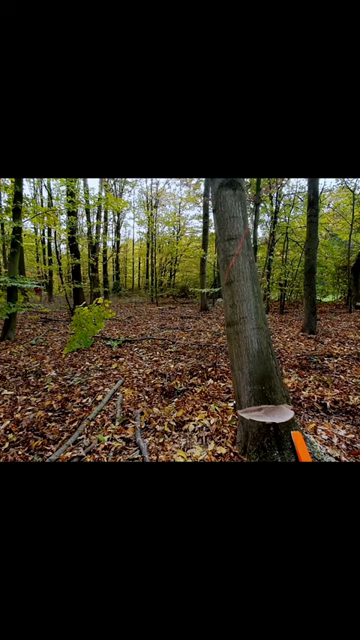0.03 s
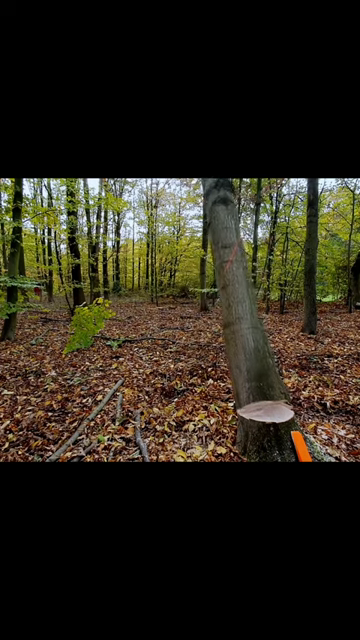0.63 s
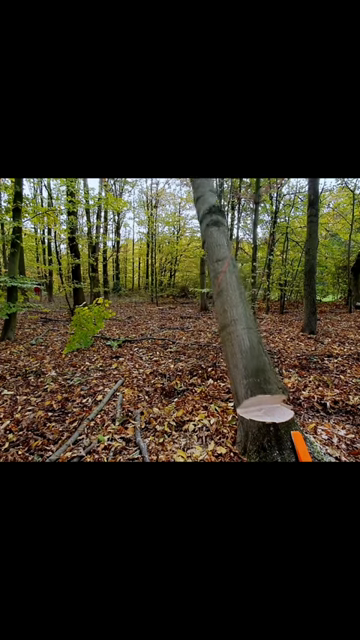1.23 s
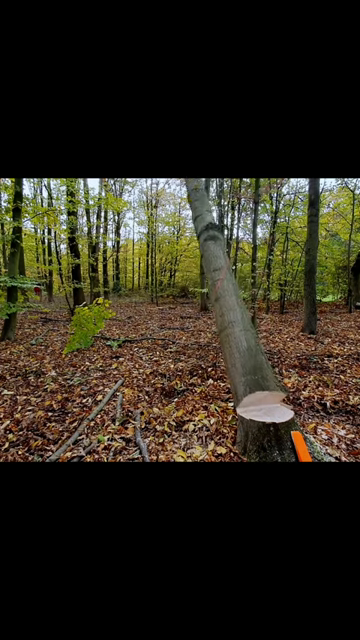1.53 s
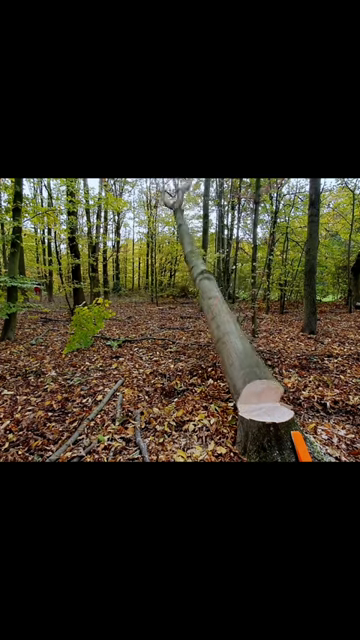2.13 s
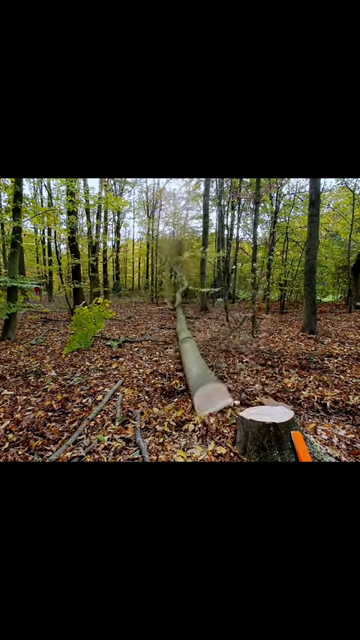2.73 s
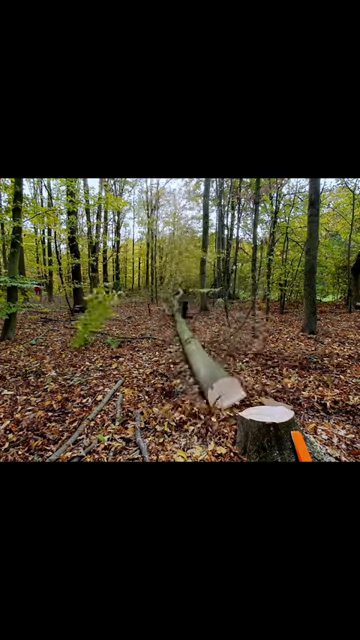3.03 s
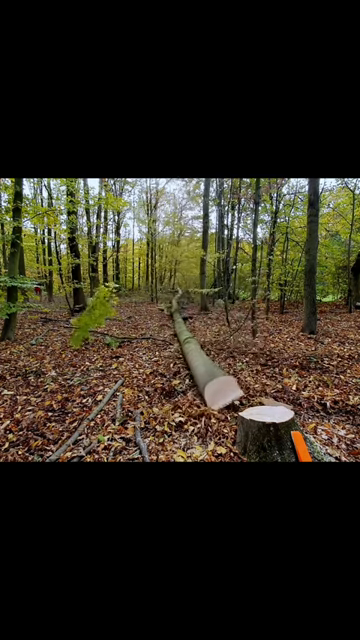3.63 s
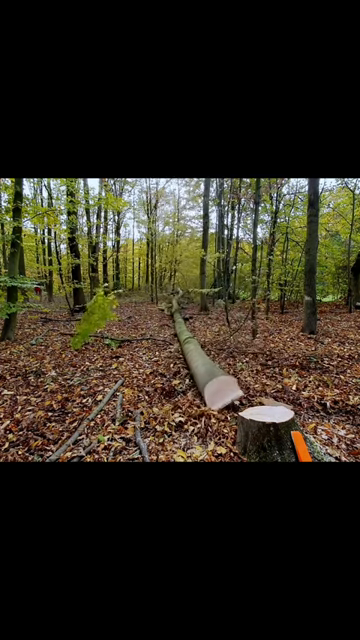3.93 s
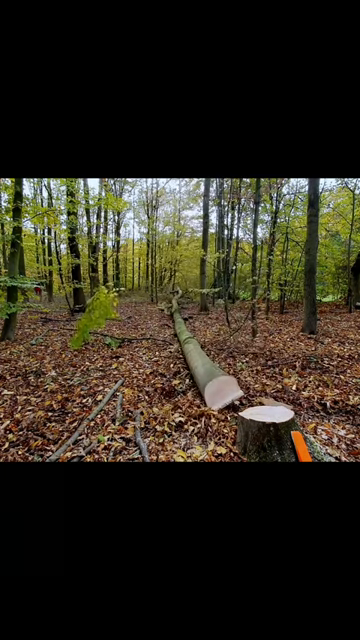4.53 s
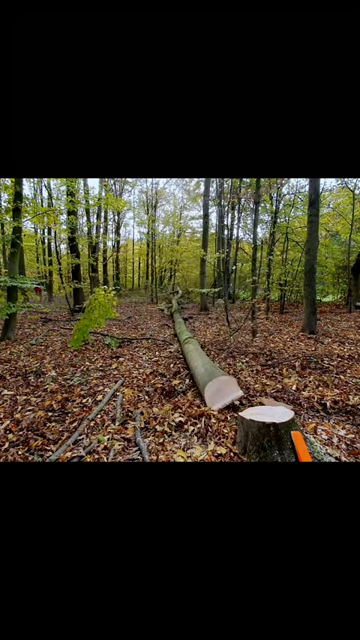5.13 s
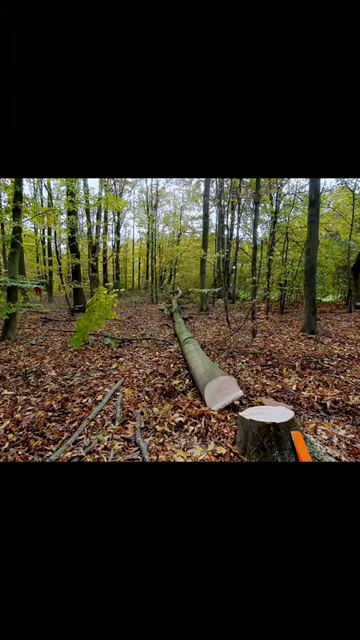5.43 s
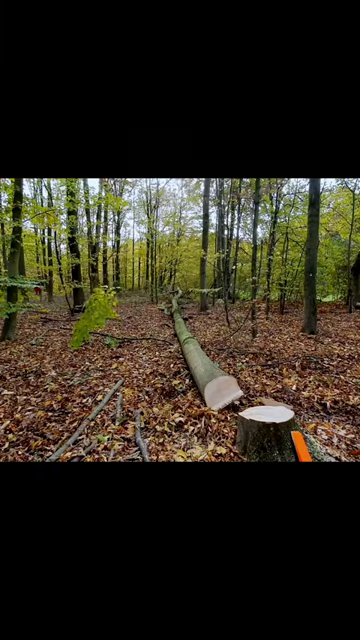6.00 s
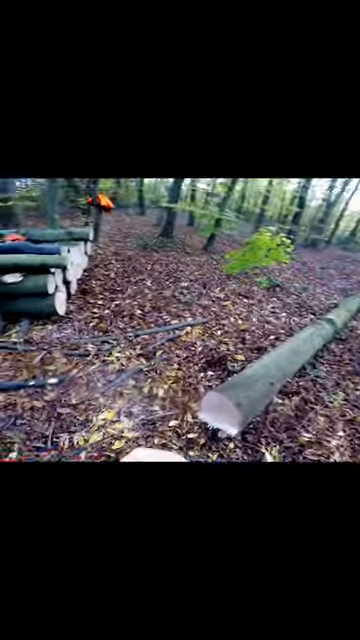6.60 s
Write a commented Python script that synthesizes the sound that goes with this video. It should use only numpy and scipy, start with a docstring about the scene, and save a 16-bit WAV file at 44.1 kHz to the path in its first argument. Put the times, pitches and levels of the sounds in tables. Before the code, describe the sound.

A sawn tree starts to tip close by in a forest, slightly to the right. From the start, wood fibres snap in sharp, dry clicks, growing denser from about 0.4 seconds as the trunk groans and creaks. A hard splitting crack comes near 1.3 seconds, and tearing continues until about 2.3. The leafy crown swishes down, swelling around 2.5 seconds. Between 2.6 and 3.3 seconds the tree crashes onto the soil with deep thuds, woody knocks, breaking branches and crushed leaves, loudest near 3 seconds. Smaller bumps and rustles die away by about 4 seconds. Twigs and bark patter lightly, with a small tick and crackle around 4.5. Dry leaves keep stirring faintly over a low distant rumble. At 6.5 seconds the sound drops out briefly, then returns as a short, dull buffeting of air on the moving microphone.

```python
"""In a forest, a sawn tree tips over close by: its hinge fibres snap and tear while the trunk groans.
The crown sweeps down, branches break and the trunk thuds on the soil; twigs and dry leaves settle.
Near the end the sound drops out briefly and returns as the dull buffeting of a moving microphone."""
import sys
import numpy as np
from scipy import signal
from scipy.fft import rfft, irfft, next_fast_len
from scipy.io import wavfile
from scipy.ndimage import map_coordinates

SR = 44100
rng = np.random.default_rng(int(sys.argv[2]) if len(sys.argv) > 2 else 0)


def output_pcm(signal):
    """Save a mono or channel-first signal as 16-bit PCM at the path in sys.argv[1].

    Samples are clipped to [-1, 1] before scaling.
    """
    pcm = np.clip(np.atleast_2d(signal).T, -1, 1) * 32767
    wavfile.write(sys.argv[1], SR, np.round(pcm).astype(np.int16))


N = 298116

# Levels are faders within a layer, ahead of its trim and the final mix.
# Featured fibre and twig snaps. Each row: time in seconds, body in dB, pitch in Hz, sizzle in dB.
SNAPS = [(0.0292, -16, 4100, -22), (0.0709, -19, 4100, -29), (0.116, -18.5, 4500, -25.5),
         (0.1214, -19.5, 3900, -29.5), (0.1606, -27.5, 4640, -22.5), (0.1724, -20, 4310, -20),
         (0.2665, -27.5, 5010, -30), (0.2753, -15.5, 4660, -23.5), (0.4251, -13.5, 3570, -16),
         (0.464, -18.5, 4410, -24.5), (0.49, -12.5, 3500, -15), (0.5288, -12.5, 3030, -18.5),
         (0.5575, -20, 5000, -25), (0.615, -26, 6010, -25.5), (0.8687, -21.5, 4060, -17),
         (0.886, -11, 4100, -22), (0.8951, -12, 3350, -14.5), (0.9339, -17, 4800, -12.5),
         (0.9498, -5.5, 2220, -21.5), (0.9874, -19.5, 3180, -17), (1.0626, -14, 4200, -22.5),
         (1.1381, -11, 3040, -14.5), (1.1513, -9.5, 2520, -16), (1.1854, -17, 3260, -17.5),
         (1.2239, -10, 3304, -18.5), (1.2993, -13.5, 2770, -9.5), (1.3879, -10.5, 3040, -17),
         (1.4083, -11.5, 2960, -23), (1.4615, -9.5, 3870, -12.5), (1.4225, -18, 4800, -26),
         (1.4779, -16.5, 3280, -25), (1.5692, -9.5, 3180, -18.5), (1.609, -9.5, 3400, -13),
         (1.6649, -9, 2630, -17.5), (1.7118, -17.5, 2920, -23), (1.8224, -12, 2270, -18),
         (1.8749, -18, 3090, -18.5), (1.9046, -14.5, 2920, -14), (1.9796, -14, 2910, -13.5),
         (2.0165, -17, 4300, -20), (2.0574, -6, 2820, -17), (2.1064, -11, 4000, -17.5),
         (2.1257, -12, 2660, -14), (2.1623, -13.5, 3870, -20.5), (2.1764, -11.5, 3100, -15.5),
         (2.1855, -12.5, 4020, -19), (2.204, -13.5, 3430, -16), (2.3019, -16, 3220, -27),
         (2.858, -8.5, 4800, -15), (4.331, -29.5, 7000, -34), (4.494, -22.5, 3700, -28),
         (5.7296, -28, 3950, -40.5)]
# Bundles of fibres, twigs or dry leaves giving way.
# Each row: start in seconds, level in dB, 60 dB decay in seconds, centre in Hz.
TEARS = [(0.03, -28, 0.112, 4540), (.047, -28.5, 0.177, 7500), (.171, -23, 0.109, 9500),
         (.293, -25, 0.226, 6400), (.37, -32.5, 0.14, 880), (.396, -25.5, 0.127, 1980),
         (.531, -22, 0.037, 7000), (1.025, -25, 0.072, 1500), (1.049, -22.5, 0.064, 2280),
         (1.239, -25, 0.15, 2000), (1.256, -25, 0.245, 4693), (1.846, -21.5, 0.0455, 7000),
         (2.254, -21.5, 0.088, 1400), (2.268, -19.5, 0.108, 2010), (2.293, -21.5, 0.046, 5000),
         (2.708, -23.5, 0.1, 1500), (2.864, -15.5, 0.095, 5800), (2.932, -22, 0.308, 700),
         (2.998, -20, 0.16, 1300), (3.035, -23, 0.152, 750), (3.134, -22, 0.205, 1690),
         (4.563, -27, 0.12, 3300), (4.573, -26, 0.23, 7600), (4.682, -35.5, 0.049, 3200),
         (5.632, -42, 0.17, 9000), (5.656, -38.5, 0.086, 7000), (5.926, -40, 0.051, 15000),
         (5.945, -44.5, 0.21, 2700), (6.404, -32.5, 0.052, 7430)]
# The ring of the broken hinge. Each row: pitch in Hz, level in dB, 60 dB decay in seconds.
HINGE_MODES = [(1773, -5.5, .07), (2905, -0.5, .09), (3100, -2.5, .04), (3240, -1.5, 0.072),
               (4005, -2.5, 0.11), (4742, -2.5, 0.078)]
# The load on the hinge, heard as a steady groan. Each row: time in seconds, level in dB.
STRAIN = [(0, -42.5), (.32, -43), (.42, -36.5), (.66, -33), (1.36, -32.5), (1.65, -39.5), (1.9, -42),
          (2.02, -35.5), (2.27, -33.5)]
# The hinge slipping under load.
# Each row: start in seconds, length in seconds, groan in dB, creak in dB, creak centre in Hz.
SLIPS = [(0.386, 0.0407, -29.5, -33.5, 400), (0.979, 0.023, -37.5, -34.5, 350),
         (1.014, 0.0388, -29, -31, 400), (1.109, 0.0157, -38, -31.5, 1160), (1.12, 0.0284, -31.5, -30, 560),
         (1.168, .024, -30.5, -25, 660), (1.189, 0.0233, -28.5, -26, 380.4), (1.247, .04, -25, -19.5, 291),
         (1.335, 0.032, -37.5, -34.5, 280), (1.51, 0.0343, -42.5, -37, 482)]
# The trunk's resonances. Each row: pitch in Hz, bandwidth in Hz, level in dB.
TRUNK_MODES = [(168, 36, -5), (287.3, 17.55, 3.5), (336, 45, -4), (401.8, 25, -6), (488.2, 30, -3.5),
               (622, 30, -1.5), (1302, 52, -9)]
# Limbs and trunk striking the ground. Each row: time in seconds, rumble in dB, trunk ring in dB.
BLOWS = [(2.7, -24.5, -30), (2.809, -29, -34), (2.888, -21, -13), (2.907, -23.5, -11.5),
         (2.932, -26.5, -16.5), (2.97, -23, -27.5), (3.035, -18, -18.5), (3.152, -22.5, -23),
         (3.188, -28, -21.5), (3.222, -31.5, -21), (3.58, -42.5, -38), (3.8, -45.5, -49), (4.16, -52, -49),
         (4.567, -47.5, -40.5), (4.635, -42.5, -37)]
# Branches breaking. Each row: start in seconds, level in dB, pitch in Hz, 60 dB decay in seconds.
BRANCHES = [(2.6863, -17, 1770, .004), (2.7151, -7.5, 2564, .003), (2.9059, -14.5, 1300, .004),
            (2.9452, -2, 1048, .008), (2.974, -13, 915, .012), (2.989, -11.5, 983, .012),
            (3.0055, -5, 1382, .012), (3.0102, -9, 1490, .005), (3.0295, -10, 1450, .012),
            (3.062, -11, 3295, .025), (3.0796, -5, 1611, .004), (3.109, -14.5, 1890, .012),
            (3.127, -12, 1880, .006), (3.1485, -6, 1685, .005), (3.176, -15, 2408, .015),
            (3.2315, -16.5, 3300, .006), (3.462, -21, 2546, .015), (3.869, -27.5, 2200, .015),
            (4.018, -32.5, 2140, .025), (5.745, -36, 1800, .004), (6.174, -34, 1290, .005)]
# The trunk hitting the soil. Each row: start in seconds, level in dB, pitch in Hz.
THUDS = [(2.614, -18.5, 66.3), (2.65, -26, 72.1), (2.869, -10, 64), (2.912, -11.5, 76), (3.031, -20.5, 64),
         (3.164, -28, 76), (3.699, -25, 68)]
# Dry leaves stirring nearby. Each row: time when full in seconds, level in dB, hold in seconds.
STIRS = [(4.344, -49, 0.04), (4.682, -48.5, 0.706), (5.478, -45, 0.134), (5.64, -42, 0.0157),
         (5.742, -47, 0.049), (5.924, -47, 0.042), (6.232, -44, 0.049), (6.37, -45.5, 0.079)]
# A faint far drone. Each row: pitch in Hz, level in dB.
HUM = [(59, -52.5), (396, -73.5)]
# Fader rides for far rumble, wind and the whole forest. Each row: time in seconds, level in dB.
RUMBLE_RIDE = [(0, -51.5), (.8, -41.5), (1.35, -42.5), (1.75, -56.5), (2.5, -48), (3.3, -48.5),
               (3.8, -49.5), (4.2, -55), (4.6, -49), (5.05, -45.5), (6.48, -45.5)]
BUFFET_RIDE = [(6.58, -67.5), (6.61, -42.5), (6.655, -31), (6.69, -35), (6.76, -30)]
FOREST_RIDE = [(6.482, 2), (6.501, -46.5), (6.55, -88)]
# Tone curves of the noise layers. Each row: frequency in Hz, relative level in dB.
GROAN_EQ = [(59, -30.5), (100, -2.5), (134, -6), (183, 0), (262, -7.5), (327, -4), (496, -9), (557, -14.5),
            (611, -6.5), (694, -12.5), (1600, -17.5), (2080, -42.5), (3520, -120)]
SWISH_EQ = [(290, -7), (500, 0.5), (668, 0.5), (906, 0), (1340, -1.5), (1460, 0.5), (1600, -1), (1790, 1),
            (3980, -0.5), (15100, -11.5), (16000, -12)]
CRUSH_EQ = [(350, -30), (600, -9), (1030, -8.5), (1410, -5.5), (2340, -5), (3390, -3), (7730, -10.5),
            (9890, -9.5), (10900, -15), (15100, -17), (16000, -20)]
LIMBS_EQ = [(29, -32.5), (50, -4.5), (100, -1.5), (155, -2), (205, 4), (270, -2.5), (320, 2), (362, -4),
            (393, 3.5), (434, -4.5), (537, -3.5), (622, -10.5), (1410, -11), (2500, -15), (3250, -57),
            (5500, -120)]
LITTER_EQ = [(350, -7.5), (600, -1.5), (698, -1), (823, -4), (1160, -5.5), (1570, -5), (3300, -1.5),
             (7940, -6), (9360, -2.5), (13000, -9.5), (15100, -9), (16000, -10)]
RUMBLE_EQ = [(18, -36.5), (30, -8), (47, -4.5), (64, 2.5), (107, -6.5), (162, -22), (194, -16),
             (267, -22.5), (393, -21.5), (440, -24), (690, -27), (824, -27.5), (1400, -31.5), (1820, -55),
             (3080, -120)]
WIND_EQ = [(15, -32), (25, 0), (115, -9), (274, -22.5), (319, -14.5), (362, -25.5), (559, -23.5),
           (685, -31.5), (1800, -37), (3240, -44), (4070, -34), (11000, -65), (14300, -111), (22000, -120)]
# Stereo width. Each row: frequency in Hz, left-right likeness from 0 (wide) to 1 (mono).
LIKENESS = [(60, 0.984), (150, 0.957), (380, 0.915), (950, 0.583), (2380, 0.29), (5980, 0.092),
            (15000, 0.01)]
# Stereo balance. Each row: frequency in Hz, left minus right in dB.
BALANCE = [(80, 0.5), (200, -1), (700, -3.5), (2400, -3.5), (4400, -6.5), (8000, -6), (14000, -4)]
# The forest's reverb. Each row: frequency in Hz, 60 dB decay in seconds.
FOREST_DECAY = [(150, 0.59), (1500, 0.31), (5000, 0.28), (14000, 0.064)]
# Swells of the fall.
# Each gives: time when full in seconds, level in dB, rise in dB/s, hold in seconds, fall in dB/s.
SWEEP = (2.5, -31, 27, 0.2, 39)  # the crown rushing through the air
SHAKING = (2.5, -36, 98.5, 0.8948, 23.5)  # limbs thrashing
CRUSHING = (3, -29, 7, 0.2434, 50)  # leaves pressed into the ground
SETTLING = (3.5, -44, 24.5, 0.38, 23.5)  # leaves springing back
RESTING = (4, -55, 39.5, 3, 40)  # the leaf litter, never quite still

HINGE_OPENS_S, HINGE_PARTS_S = 0.37, 2.5
TIME = np.arange(N) / SR


def snaps(second_db=-8, wood_db=-20, sizzle_hz=10700, sizzle_t60=0.0036):
    """A fibre parts in two steps and knocks the wood; splinters sizzle, the litter scatters the click."""
    t = np.arange(SR // 50) / SR - .001
    direct, scatter = np.zeros(N), np.zeros((2, N))
    fibres = SNAPS + weak_snaps()
    chance = rng.uniform(-1, 1, (len(fibres), 2))
    for (s, db, hz, sizzle_db), (gap, size) in zip(fibres, chance):
        gap_s = 0.0005464 * 1.44 ** gap
        body = fracture(t, hz) + amp(second_db + 3.3 * size) * fracture(t - gap_s, hz)
        body += amp(wood_db) * fracture(t, hz * 0.518)
        hiss = rng.standard_normal(len(t)) * (t > 0) * amp(-60 * np.abs(t) / sizzle_t60)
        sizzle = band(hiss, sizzle_hz, octaves=.5)
        add(direct, s + t[0], amp(db - 3.5) * blip(body) + amp(sizzle_db - 3) * blip(sizzle))
        add(scatter, s, amp(db - 20) * crackle(t60=0.064, hz=4100, octaves=1.1))
    return from_right(direct, lag_ms=0.121) * amp([[-2], [0]]) + scatter


def weak_snaps(count=10, body_db=-23.5, hz=4300, sizzle_db=-30):
    """Extra SNAPS rows: lesser fibres go at random, ever more often as the hinge opens."""
    progress = np.sqrt((np.arange(count) + rng.random(count)) / count)
    times = HINGE_OPENS_S + progress * (HINGE_PARTS_S - HINGE_OPENS_S)
    return [(s, body_db + 2 * size, hz * 2 ** (.25 * pitch), sizzle_db + 2 * bright)
            for s, (size, pitch, bright) in zip(times, rng.standard_normal((count, 3)))]


def fracture(t, hz, cycles=0.506):
    """The click of parting wood: a push, a pull and a push of air, centred on t = 0."""
    return -np.cos(2 * np.pi * hz * t) * np.exp(-(hz * t / cycles) ** 2)


def tears():
    """Many small fibres go at once; the finer they are, the higher and wider the burst."""
    bursts = np.zeros((2, N))
    for s, db, t60, hz in TEARS:
        add(bursts, s, amp(db - 1) * crackle(t60, hz, octaves=1 + 0.25 * np.log2(hz / 3000)))
    return bursts


def hinge_break(start_s=1.2562, crack_hz=3100, rip_s=.0042):
    """The last thick strap of the hinge rips through: a hard, narrow crack, then its stub rings."""
    t = np.arange(SR // 4) / SR
    torn = np.minimum(t / rip_s, 1)
    rip = rng.standard_normal((2, len(t))) * np.sin(np.pi * torn)
    ring = sum(amp(db - 60 * t / t60) * np.sin(2 * np.pi * hz * t + 2 * np.pi * rng.random())
               for hz, db, t60 in HINGE_MODES)
    crack = amp(-8) * blip(band(rip[0], crack_hz, octaves=0.2))
    splinters = amp(-12) * blip(band(rip[1], crack_hz, octaves=0.56))
    strap = np.zeros(N)
    add(strap, start_s, crack + splinters + amp(-10) * blip(ring * torn))
    return from_right(strap, lag_ms=0.105)


def fraying(hz=10000, growth_db_per_s=6.5):
    """The finest fibres tick in clusters, louder with the load and as the hinge opens."""
    ticks = band(grains(420, 10, 0.92)[0], hz, octaves=0.33)
    clusters = unit(ticks * amp(5 * wobble(28)))
    opening = amp(-19 + growth_db_per_s * np.minimum(TIME, HINGE_PARTS_S))
    return from_right(ride(STRAIN) * opening * clusters, lag_ms=0.099)


def trunk_groan():
    """The loaded hinge rasps and makes the trunk groan; the groan surges at each slip."""
    surges = [swell(s + length / 2, db, rise=230, hold=0.011, fall=399.5)
              for s, length, db, _, _ in SLIPS]
    load = together([ride(STRAIN)] + surges)
    groan = load * amp(-2.5 + 1.9 * wobble(25.137)) * spread(grains(220, 4.8, 0.51), GROAN_EQ)
    rasp = ride(STRAIN) * amp(-4.5 + wobble(29.9)) * spread(grains(1300, 7.7, 0.25), SWISH_EQ)
    return groan + rasp


def creaks(catches_per_s=400):
    """The hinge sticks and slips in short runs; each rings the trunk's modes around its own pitch."""
    t = np.arange(SR // 4) / SR
    wood = np.zeros(N)
    for s, length, _, db, hz in SLIPS:
        arch = np.sqrt(np.abs(np.sin(np.pi * np.minimum(t / length, 1))))
        catches = grains(catches_per_s, 3, 0.84, size=len(t))[0] * arch
        ringing = signal.fftconvolve(catches, trunk_ring(t, damping=1.25))[:len(t)]
        creak = band(ringing, hz, octaves=0.646)
        add(wood, s, amp(db) * creak * np.sqrt(length * SR) / np.linalg.norm(creak))
    return from_right(wood, lag_ms=0.082)


def trunk_knocks(scrape_t60=0.038, scrape_db=2):
    """Blows on the ground knock and scrape the trunk; the soil chokes its ring."""
    t = np.arange(SR // 4) / SR
    knocks = np.zeros(N)
    for s, _, db in BLOWS:
        ring = trunk_ring(t, damping=2.4)
        friction = rng.standard_normal(len(t)) * amp(-60 * t / scrape_t60)
        scrape = signal.fftconvolve(ring, friction / np.linalg.norm(friction))[:len(t)]
        blow = ring + amp(scrape_db) * scrape
        add(knocks, s, amp(db) * blow / np.abs(blow).max())
    return from_right(knocks, lag_ms=0.082)


def trunk_ring(t, damping):
    """The trunk's modes, a little different at every touch; more damping shortens them."""
    return sum(amp(db + rng.normal(0, 2.6)) * np.exp(-np.pi * width * damping * t)
               * np.sin(2 * np.pi * hz * rng.normal(1, 0.022) * t) for hz, width, db in TRUNK_MODES)


def crown():
    """Leaves rush through the air, then crossfade to a crush while the limbs pound the ground."""
    landed = np.interp(TIME, [2.75, 2.98], [0, 1])
    swish = swell(*SWEEP) * spread(grains(1300, 7, .33), SWISH_EQ)
    pressing = together([swell(*CRUSHING), swell(*SETTLING)])
    crush = pressing * amp(1) * spread(grains(1800, 7, 0.3), CRUSH_EQ)
    leaves = amp(0.95 * wobble(29.688)) * (np.sqrt(1 - landed) * swish + np.sqrt(landed) * crush)
    pounding = [swell(s, db, rise=377.5, hold=0.0137, fall=259.5) for s, db, _ in BLOWS]
    thrashing = together([swell(*SHAKING)] + pounding) * amp(-1.5 + 0.77 * wobble(25.06))
    return leaves + thrashing * spread(grains(500, 5, 0.446), LIMBS_EQ)


def branches(overtone_ratio=1.47):
    """A branch breaks with a short woody ring and a spray of splinters around its pitch."""
    t = np.arange(SR // 20) / SR
    cracks, spray = np.zeros(N), np.zeros((2, N))
    for s, db, hz, t60 in BRANCHES:
        modes = np.sin(2 * np.pi * hz * t) + amp(-7) * np.sin(2 * np.pi * hz * overtone_ratio * t)
        envelope = amp(-60 * t / t60) * (1 - np.exp(-4 * t * hz))
        add(cracks, s, amp(db - 6) * blip(modes * envelope))
        add(spray, s, amp(db - 19) * crackle(t60=0.102, hz=hz, octaves=0.82))
    return from_right(cracks, lag_ms=0.018) + spray


def thuds(t60=0.087, attack_s=0.008):
    """The low-end weight: the soil gives a few deep swings under each landing of the trunk."""
    t = np.arange(SR // 2) / SR
    ground = np.zeros(N)
    for s, db, hz in THUDS:
        envelope = amp(db + 3 - 60 * t / t60) * (1 - np.exp(-t / attack_s))
        add(ground, s, envelope * np.sin(2 * np.pi * hz * t))
    return ground


def debris():
    """Twigs snap all through the landing crown; then leaves and bits of bark patter on the litter."""
    # The negative decay reverses each twig's burst: it peaks and cuts off 0.25 s after its start.
    twigs = sprinkle(2.5, 3.5, db=-21.5, hz=3600, t60=-0.03, count=34)
    patter = sprinkle(3.5, 6, db=-40.5, hz=5200, t60=0.2, count=22)
    return twigs + patter


def tink(start_s=4.494, hz=3800, db=-38, t60=0.086):
    """A small hard tick at start_s rings briefly with a thin, faint tone."""
    age = np.maximum(TIME - start_s, 0)
    return amp(db - 60 * age / t60) * np.sin(2 * np.pi * hz * age)


def echoes(x):
    """The standing trunks throw back a thin tail, the treble dying first."""
    hz, t, noise = signal.stft(rng.standard_normal((2, SR)), SR, nperseg=256)
    decay = amp(-60 * t / along(FOREST_DECAY, hz)[:, None])
    tail = signal.istft(noise * decay, SR, nperseg=256)[1]
    return signal.fftconvolve(x, tail / np.linalg.norm(tail[0]), axes=1)[:, :N]


def buffeting():
    """Air buffets the moving microphone: a dull burst of noise at the very end."""
    return ride(BUFFET_RIDE) * spread(rng.standard_normal((2, N)), WIND_EQ)


def woodland():
    """The ambience bed: a far rumble, a wavering hum and dry leaves stirring nearby."""
    rumble = ride(RUMBLE_RIDE) * amp(.5) * spread(rng.standard_normal((2, N)), RUMBLE_EQ)
    hum = sum(amp(db + 2.3 * wobble(5)) * unit(np.sin(2 * np.pi * hz * TIME + 1.14 * wobble(9.3)))
              for hz, db in HUM)
    stirs = [swell(s, db, rise=115.5, hold=hold, fall=172.5) for s, db, hold in STIRS]
    stirring = together([swell(*RESTING)] + stirs) * amp(-0.59 + 1.2 * wobble(35))
    return rumble + hum + stirring * spread(grains(300, 10, 0.19), LITTER_EQ)


def sprinkle(from_s, to_s, db, hz, t60, count):
    """Small separate crackles at random moments, each with its own size and pitch."""
    track = np.zeros((2, N))
    times = from_s + (to_s - from_s) * (np.arange(count) + rng.random(count)) / count
    for s, (size, pitch) in zip(times, rng.standard_normal((count, 2))):
        add(track, s, amp(db + 2.5 * size) * blip(crackle(t60, hz * 2 ** (pitch / 2), octaves=0.51)))
    return track


def crackle(t60, hz, octaves):
    """A quarter-second stereo burst of splinters, falling 60 dB every t60 seconds."""
    t = np.arange(SR // 4) / SR
    mid, side = unit(band(grains(2200, 3.1, 0.4, size=len(t)), hz, octaves))
    angle = width_angle(hz)
    return (np.cos(angle) * mid + np.sin(angle) * np.array([side, -side])) * amp(-60 * t / t60)


def grains(per_s, spread_db, share, size=N):
    """Two channels of tiny random clicks, taking their share of the power, over smooth noise."""
    chance, sign, height = rng.random((3, 2, size))
    clicks = (chance < per_s / SR) * np.sign(sign - .5) * amp(spread_db * 2 * height)
    return np.sqrt(share) * unit(clicks) + np.sqrt(1 - share) * rng.standard_normal((2, size))


def spread(pair, eq):
    """Colour two unrelated signals into one source: near mono in the bass, wide in the treble."""
    def response(hz):
        return amp(along(eq, hz)) * [np.cos(width_angle(hz)), np.sin(width_angle(hz))]
    mid, side = filtered(pair, response)
    return np.array([mid + side, mid - side]) / np.std(mid)


def width_angle(hz):
    """The mid-side angle in radians that gives the stereo width at this frequency."""
    return np.arccos(np.clip(along(LIKENESS, hz), 0, 1)) / 2


def from_right(x, lag_ms):
    """Pan by delay: a point source reaches the left channel a little later."""
    return filtered(x, lambda hz: np.array([np.exp(-2j * np.pi * hz * lag_ms / 1000), np.ones(len(hz))]))


def ride(rows):
    """A fader ride through (seconds, dB) rows, fading at 200 dB/s outside them."""
    s, db = np.transpose(rows)
    outside_s = np.abs(TIME - np.clip(TIME, s[0], s[-1]))
    return amp(np.interp(TIME, s, db) - 200 * outside_s)


def swell(s, db, rise, hold, fall):
    """An envelope that rises (dB/s) to its level at s, holds (seconds) and falls (dB/s)."""
    return amp(db - rise * np.maximum(s - TIME, 0) - fall * np.maximum(TIME - s - hold, 0))


def wobble(per_s):
    """Smooth random modulation through per_s points a second."""
    return map_coordinates(rng.standard_normal(int(N * per_s / SR) + 4), [TIME * per_s])


def together(gains):
    """Joint gain of unrelated sounds: their powers sum."""
    return np.sqrt(sum(g * g for g in gains))


def band(x, hz, octaves):
    """Keep a bell-shaped band of a short sound."""
    f = np.fft.rfftfreq(x.shape[-1], 1 / SR)
    return irfft(rfft(x) * np.exp(-.5 * (np.log2((f + 1) / hz) / octaves) ** 2), x.shape[-1])


def filtered(x, response):
    """Filter a full track by a response given as a function of Hz."""
    size = next_fast_len(N + SR // 2)
    return irfft(rfft(x, size) * response(np.fft.rfftfreq(size, 1 / SR)), size)[..., :N]


def along(points, hz):
    """Read a curve of (Hz, value) points on a log axis."""
    f, values = np.transpose(points)
    return np.interp(np.log(hz + 1), np.log(f + 1), values)


def add(track, s, sound):
    """Mix a sound into a track at s seconds."""
    part = track[..., max(round(s * SR), 0):][..., :sound.shape[-1]]
    part += sound[..., :part.shape[-1]]


def blip(x):
    """Scale a short sound to the energy of 1 ms at rms 1."""
    return x / np.sqrt(np.sum(x * x) * 1000 / SR + 1e-20)


def unit(x):
    """Scale to rms 1."""
    return x / np.sqrt(np.mean(x ** 2) + 1e-20)


def amp(db):
    """Decibels to gain."""
    return 10 ** (np.asarray(db) / 20)


def scene(echo_db=-14):
    """The mix: the forest leans a little to the right; after the dropout only the buffeting is left."""
    breaking = snaps() + fraying() + tears() + hinge_break() + branches() + tink()
    forest = breaking + amp(echo_db) * echoes(breaking)
    forest += trunk_groan() + trunk_knocks() + creaks() + crown() + thuds() + woodland() + debris()
    forest = filtered(forest, lambda hz: amp(np.array([along(BALANCE, hz), -along(BALANCE, hz)]) / 2))
    fader = amp(np.interp(TIME, *np.transpose(FOREST_RIDE)))
    return forest * fader + buffeting()


def record(dry, low_hz=39, top_hz=15950):
    """The microphone sheds the deepest bass, rounds off the loudest snaps and cuts the highest treble."""
    thinned = signal.sosfilt(signal.butter(2, low_hz, "highpass", fs=SR, output="sos"), dry)
    rounded = thinned / (1 + np.abs(thinned) ** 6) ** (1 / 6)
    return filtered(rounded, lambda hz: hz < top_hz)


dry = scene()
out = record(dry)
output_pcm(out)
```